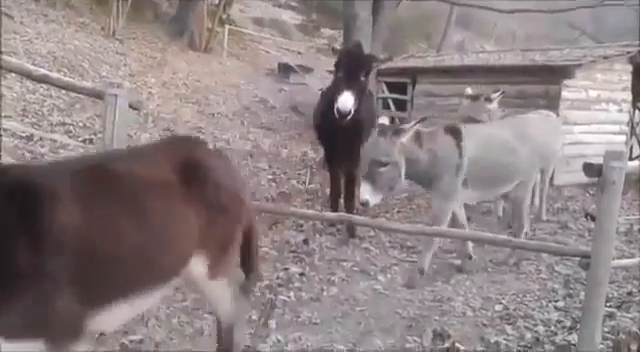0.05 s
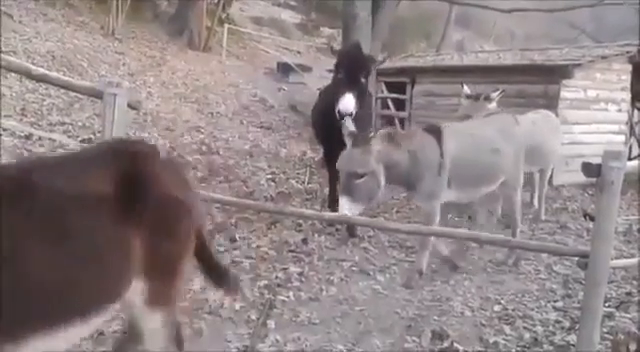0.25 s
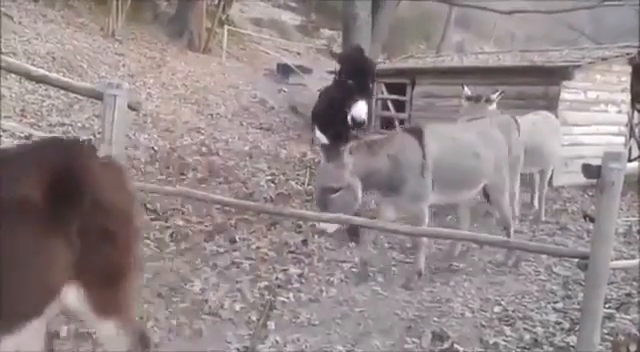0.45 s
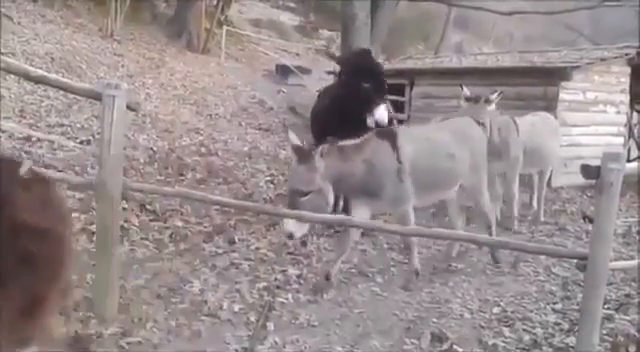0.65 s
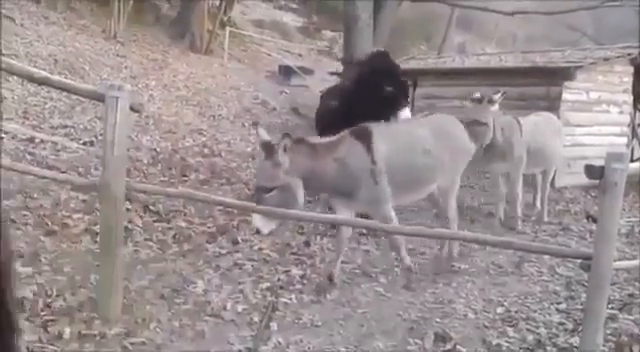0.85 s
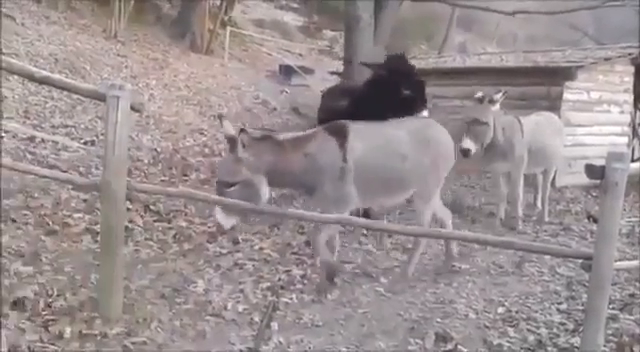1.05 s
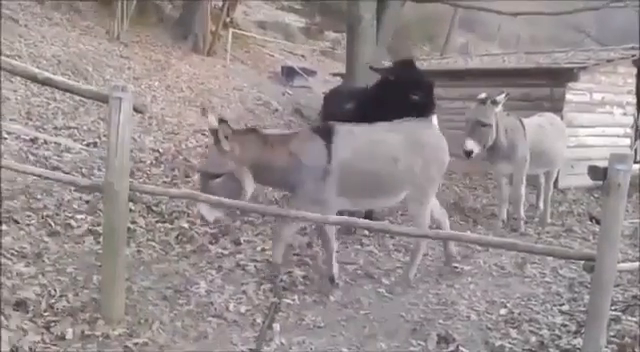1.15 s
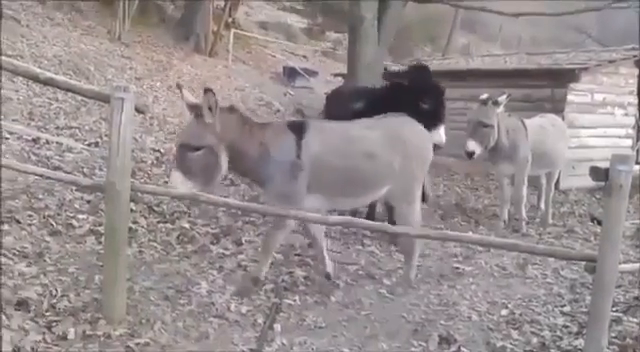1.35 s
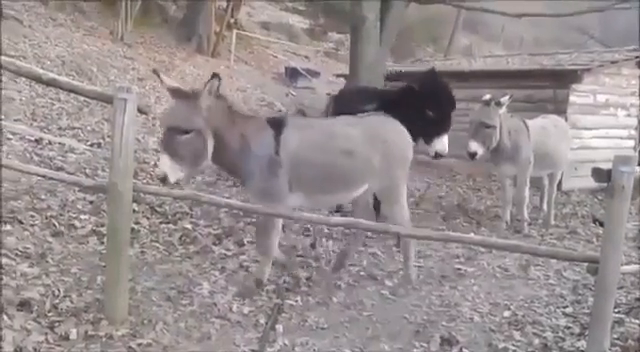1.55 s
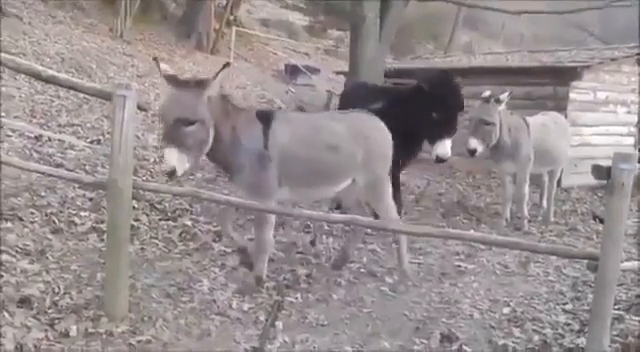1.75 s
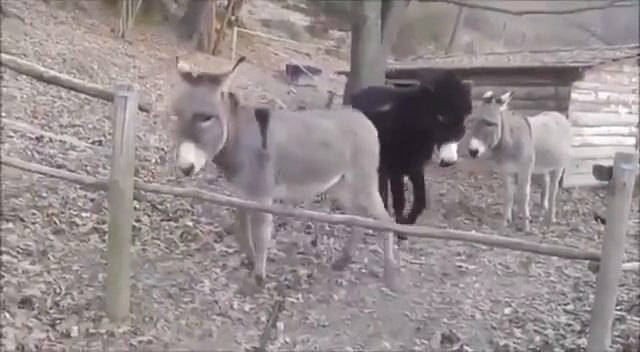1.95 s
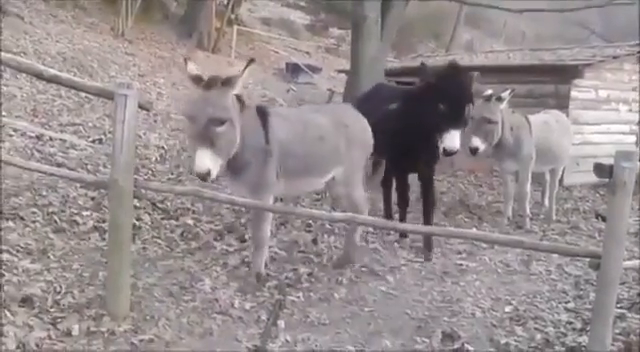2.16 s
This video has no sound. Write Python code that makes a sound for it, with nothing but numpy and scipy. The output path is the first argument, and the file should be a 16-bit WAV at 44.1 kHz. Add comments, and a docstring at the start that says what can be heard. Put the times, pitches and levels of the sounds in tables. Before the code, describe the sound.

Hooves knock on wood as donkeys walk through dry leaves outdoors. A loud, close knock is followed by scuffing steps and three more quick knocks, with small twig snaps, soft thuds and light wind on the microphone.

```python
"""Donkeys walk over dry leaves in a fenced paddock, above a steady rustle and a low outdoor rumble.
At first hooves thud on the soil and snap twigs, and a hard, dead knock, like hoof on wood, sounds close by.
The hooves then scuff and drag through the litter, each stroke a swarm of tiny fractures.
From 1.5 s three more knocks excite the heavily damped wood, among further scuffs, snaps and thuds."""
import sys
import numpy as np
from scipy import signal
from scipy.fft import rfft, irfft, next_fast_len
from scipy.io import wavfile
from scipy.ndimage import uniform_filter1d, map_coordinates

SR = 44100
rng = np.random.default_rng(int(sys.argv[2]) if len(sys.argv) > 2 else 0)


def master(y):
    """Save y as 16-bit WAV."""
    cut = np.clip(np.atleast_2d(y).T, -1, 1)
    pcm = np.round(cut * 32767)  # scale
    wavfile.write(sys.argv[1], SR, pcm.astype(np.int16))


N = 97020

# Blows on wood. Each row: start in seconds, gain in dB, then brightness, click and ring in relative dB.
KNOCK_EVENTS = [(0.2354, 21.5, 1.78, -14, -20), (1.5146, 16, -4, -2.5, -16), (1.6513, 13.5, -5.5, 5, -15),
                (1.9070, 13.5, -1.96, 2, -16.5)]
# Response of the struck wood. Each row: frequency in Hz, gain in dB.
WOOD_RESPONSE = [(60, -42.5), (160, -27), (300, -14), (430, -12.5), (610, -6), (770, -9.5), (1000, -0.5),
                 (1220, 1), (1580, -2.5), (1900, -8), (2170, -26.5), (2450, -16), (3100, -16.5),
                 (3750, -12), (4600, -21.5), (5800, -32.5), (7000, -27.5), (10000, -32)]
# Hoof strokes in the leaves. Each row: start in seconds, rise in seconds, time to fall 20 dB in seconds,
# level in dB, then grit and crispness in relative dB.
SCUFF_EVENTS = [(0, .003, 0.0059, -50, -4.5, 1), (.058, .006, 0.0615, -44.5, -7.5, 1),
                (.078, 0.0119, 0.0664, -48, -6.5, -3), (.18, .003, 0.004, -52.5, -13.5, 6),
                (.25, 0.0323, 0.0343, -51.5, -9, -2.5), (.365, 0.0141, .03, -52.5, -21.5, 1),
                (.395, 0.0334, 0.0293, -43.5, -9, -6.5), (0.505, 0.00484, 0.0262, -40.5, -5.5, 5),
                (.571, .002, .025, -48.5, -8.5, -0.5), (.62, 0.0204, 0.0428, -53, -5, 1.5),
                (.66, 0.059, .11, -48.5, -13, -4), (.873, 0.0028, 0.0636, -50.5, -6, 5),
                (.885, 0.0242, 0.057, -49, -7, 2), (.94, 0.039, 0.1192, -52.5, -2, 4.5),
                (1.14, 0.0386, 0.0252, -50, -13, 3), (1.41, 0.0383, 0.1522, -57, -3.5, 5),
                (1.52, 0.0268, 0.1057, -53, -4.5, 3), (1.618, 0.00845, 0.05, -48.5, -5, 3),
                (1.654, 0.05745, .065, -45.5, 0, 2.5), (1.765, 0.018, 0.0938, -59, 0, 3.5),
                (2.012, 0.00368, 0.05, -52, -3.5, 3), (2.06, 0.0252, 0.1246, -59, -1, 2.5)]
# Spectra of crushed leaves and scraped grit. Each row: frequency in Hz, relative level in dB.
LEAF_SPECTRUM = [(150, -25), (400, -7.5), (800, -7.5), (1400, -6), (2100, -5), (2700, -6.5), (3400, -2),
                 (4400, 1.5), (5500, -2.5), (7200, -8.5), (8700, -3), (10500, -13)]
GRIT_SPECTRUM = [(150, -20), (500, -9), (850, -12), (1250, -5.5), (1600, -6.5), (2150, 3), (2700, -13),
                 (4000, -22), (10000, -35)]
# Twigs breaking and hooves landing on soil. Each row: start in seconds, level in dB, pitch in Hz.
TWIG_SNAPS = [(.065, -38, 597), (0.0994, -37, 1192), (.182, -37, 8760), (0.2124, -42, 1600),
              (1.6253, -38, 1307), (1.769, -34, 1906), (1.787, -48, 2276), (2.015, -40, 1885)]
SOIL_THUDS = [(.034, -40, 140), (.063, -38, 230), (.074, -41, 110), (.107, -36.5, 70), (.256, -38.5, 75),
              (1.7824, -33.5, 120), (1.79, -41, 220), (1.812, -46, 169.2)]
# Course of the steady rustle. Each row: time in seconds, level in dB.
RUSTLE_LEVELS = [(0, -55.5), (.15, -56), (.21, -59), (.33, -54.5), (.46, -56), (.495, -60), (.55, -57),
                 (.6, -56.5), (.78, -54), (.85, -58), (1.02, -56.5), (1.13, -62), (1.29, -61), (1.39, -65),
                 (1.58, -60.5), (1.83, -59), (1.95, -64.5), (2.13, -62), (2.2, -63.5)]
# Spectra of rustling litter, distant rumble and buffeting air.
# Each row: frequency in Hz, relative level in dB.
LITTER_SPECTRUM = [(200, -10), (450, -5), (800, -5.5), (1500, -4.5), (2150, -3.5), (2700, -7.5), (3400, -2),
                   (4400, 0.5), (5600, -4.5), (7200, -8), (8700, -2.5), (10500, -12)]
RUMBLE_SPECTRUM = [(20, -22.5), (70, -13), (120, -1), (190, 0), (290, -5.5), (430, -14), (800, -19.5),
                   (2000, -24.5), (6000, -40)]
BUFFET_SPECTRUM = [(20, -17), (45, -5), (75, 0), (115, -3.5), (200, -15.5), (400, -34.5), (2000, -70)]
# Course of the air buffeting the microphone. Each row: time in seconds, level in dB.
BUFFET_LEVELS = [(0, -60), (.12, -57), (.22, -60), (.4, -66.5), (.7, -74), (.85, -65.5), (.95, -71.5),
                 (1.1, -64.5), (1.3, -66), (1.58, -60.5), (1.82, -58), (1.95, -62), (2.2, -67.5)]


def wood_knocks():
    """An impact excites the impulse response of damped wood; a short ring and a faint echo follow."""
    out = np.zeros(N)
    for start, db, bright_db, click_db, ring_db in KNOCK_EVENTS:
        blow = impulse_response(lambda hz: along(WOOD_RESPONSE, hz)
                                + bright_db * above(hz, corner_hz=2200)
                                + click_db * above(hz, corner_hz=7500))
        ring = amp(ring_db) * diffuse_tail(t60_s=.032)
        yard_echo = amp(-29.5) * diffuse_tail(t60_s=.2)
        path = ring + yard_echo
        path[0] = 1  # the direct sound
        add(out, start, -amp(db) * signal.fftconvolve(blow, path))
    return out


def hoof_scuffs():
    """Hooves crush leaves and scrape grit; the strokes are incoherent, so their powers add."""
    t, power = np.arange(N) / SR, np.zeros((3, N))
    for start, rise, fall, db, grit_db, crisp_db in SCUFF_EVENTS:
        swell = np.clip((t - start) / rise, 0, 1)
        decay = amp(-20 * np.maximum(t - start - rise, 0) / fall)
        layer_gains = amp([[0], [crisp_db], [grit_db]])
        power += (amp(db) * swell * decay * layer_gains) ** 2
    leaves = crackle(LEAF_SPECTRUM)
    crisp = filtered(leaves, lambda hz: above(hz, corner_hz=6000))
    layers = [leaves - crisp, crisp, crackle(GRIT_SPECTRUM)]
    return np.sum(np.sqrt(power) * layers, axis=0)


def twig_snaps(t60_s=.0087, crack_db=-9):
    """Brittle fracture releases a broadband crack and one quickly damped resonance."""
    out, t = np.zeros(N), np.arange(SR // 20) / SR
    for start, db, hz in TWIG_SNAPS:
        snap = np.sin(2 * np.pi * hz * t) + amp(crack_db) * rng.standard_normal(len(t))
        add(out, start, amp(db - 60 * t / t60_s) * snap)
    return out


def soil_thuds(attack_s=.0019, t60_s=.06):
    """Soil yields under a hoof and responds as a damped oscillator of low frequency."""
    out, t = np.zeros(N), np.arange(SR // 4) / SR
    for start, db, hz in SOIL_THUDS:
        envelope = amp(db - 60 * t / t60_s) * (1 - np.exp(-t / attack_s))
        add(out, start, envelope * np.sin(2 * np.pi * hz * t))
    return out


def litter_rustle(flutter_db=1):
    """The herd keeps the litter stirring; many small fractures superpose into a continuous rustle."""
    level_db = np.interp(np.arange(N) / SR, *np.transpose(RUSTLE_LEVELS))
    return amp(level_db + flutter_db * wobble(rate_hz=50)) * crackle(LITTER_SPECTRUM)


def distant_rumble(start_db=-57, fade_db_per_s=2.5, swing_db=1.5):
    """Low-frequency ambient noise, randomly modulated in amplitude, slowly fades."""
    level_db = start_db - fade_db_per_s * np.arange(N) / SR + swing_db * wobble(rate_hz=20)
    return amp(level_db) * coloured(rng.standard_normal(N), RUMBLE_SPECTRUM)


def air_buffeting(swing_db=1):
    """Light air on the microphone produces low-frequency pressure fluctuations."""
    level_db = np.interp(np.arange(N) / SR, *np.transpose(BUFFET_LEVELS))
    level_db += swing_db * wobble(rate_hz=12)
    return amp(level_db) * coloured(rng.standard_normal(N), BUFFET_SPECTRUM)


def crackle(spectrum, grains_per_s=3000, spread_db=4, grain_share=.6, clump_db=1.0655):
    """Shot noise: tiny fractures of uneven size sound in clumps over a soft hiss."""
    impulses = (rng.random(N) < grains_per_s / SR) * rng.choice([-1, 1], N)
    sizes = amp(spread_db * np.clip(rng.standard_normal(N), -2, 2))
    grains = np.sqrt(grain_share) * unit(impulses * sizes)
    hiss = np.sqrt(1 - grain_share) * rng.standard_normal(N)
    clumps = amp(clump_db * wobble(rate_hz=250))
    return coloured(leaf_resonances((grains + hiss) * clumps), spectrum)


def leaf_resonances(x, depth_db=3.5):
    """Every leaf resonates at its own pitch, so brief, narrow patches of the spectrum stand out."""
    spectra = signal.stft(x, nperseg=512)[2]
    patches = uniform_filter1d(rng.standard_normal(spectra.shape), size=4, axis=0)  # across frequency
    patches = uniform_filter1d(patches, size=6, axis=1)  # across time
    return signal.istft(spectra * amp(depth_db * unit(patches)), nperseg=512)[1][:N]


def impulse_response(gain_db, size=4096):
    """Folding the cepstrum gives the causal, minimum-phase response for a gain in dB against Hz."""
    cepstrum = irfft(np.log(amp(gain_db(np.fft.rfftfreq(size, 1 / SR)))))
    cepstrum[1:size // 2] *= 2
    cepstrum[size // 2 + 1:] = 0
    return irfft(np.exp(rfft(cepstrum)))


def diffuse_tail(t60_s, onset_s=.0018):
    """Scattered sound builds just after a blow and decays exponentially; its energy is 1."""
    t = np.arange(SR // 4) / SR
    onset = 1 - np.exp(-(t / onset_s) ** 2)
    scatter = rng.standard_normal(len(t)) * amp(-60 * t / t60_s) * onset
    return scatter / np.linalg.norm(scatter)


def amp(db):
    """Amplitude grows tenfold for every 20 dB."""
    return 10 ** (np.asarray(db) / 20)


def unit(x):
    """Normalisation brings the rms to 1."""
    return x / np.sqrt(np.mean(x ** 2) + 1e-20)


def along(points, hz):
    """Interpolation joins (Hz, value) points on a logarithmic frequency axis."""
    frequencies, values = np.transpose(points)
    return np.interp(np.log(hz + 1), np.log(frequencies + 1), values)


def above(hz, corner_hz):
    """A high-pass curve steps smoothly from 0 to 1 across its corner."""
    return hz ** 6 / (hz ** 6 + corner_hz ** 6)


def filtered(x, response):
    """A linear filter multiplies the spectrum by its frequency response."""
    size = next_fast_len(len(x) + SR // 4)
    return irfft(rfft(x, size) * response(np.fft.rfftfreq(size, 1 / SR)), size)[:len(x)]


def coloured(x, spectrum):
    """Spectral weighting colours a signal, returned at rms 1."""
    return unit(filtered(x, lambda hz: amp(along(spectrum, hz))))


def wobble(rate_hz):
    """A spline through random knots, rate_hz of them a second, gives a smooth modulation."""
    knots = rng.standard_normal(int(N * rate_hz / SR) + 4)
    return map_coordinates(knots, [np.arange(N) * rate_hz / SR])


def add(out, start_s, sound):
    """A sound is superposed on the output from its start time."""
    i = max(round(start_s * SR), 0)
    out[i:i + len(sound)] += sound[:N - i]


def scene():
    """The pressures of all sources add linearly at one microphone."""
    hooves = wood_knocks() + hoof_scuffs() + twig_snaps() + soil_thuds()
    background = litter_rustle() + distant_rumble() + air_buffeting()
    return (hooves + background)[None]


def record(dry):
    """A steep low-pass filter limits the bandwidth."""
    top_hz, slope_width_hz = 10700, 500
    return np.array([filtered(x, lambda hz: np.clip((top_hz - hz) / slope_width_hz + .5, 0, 1))
                     for x in dry])


dry = scene()
out = record(dry)
master(out)
```